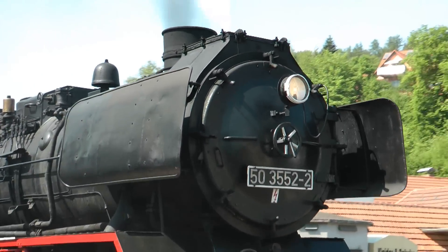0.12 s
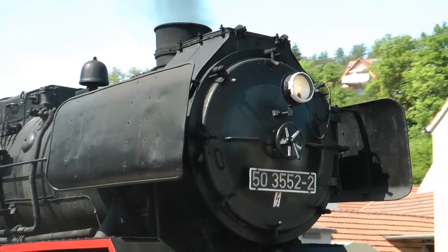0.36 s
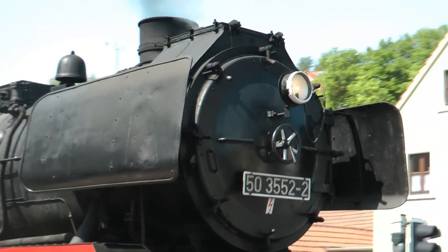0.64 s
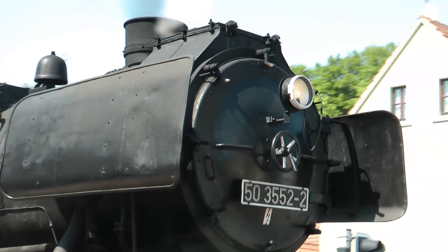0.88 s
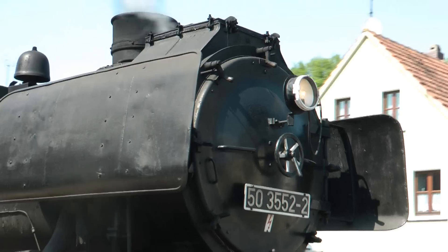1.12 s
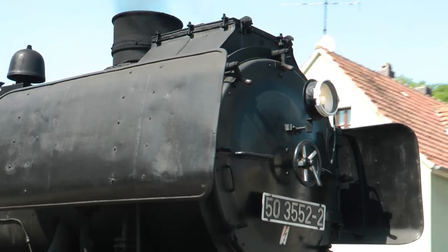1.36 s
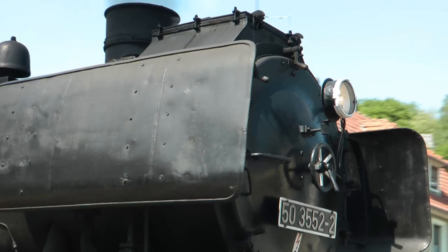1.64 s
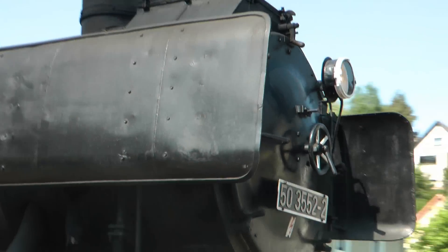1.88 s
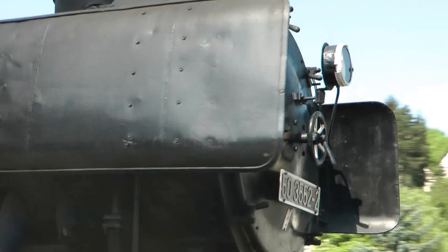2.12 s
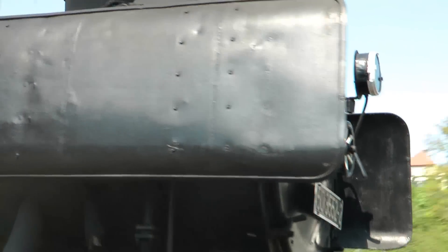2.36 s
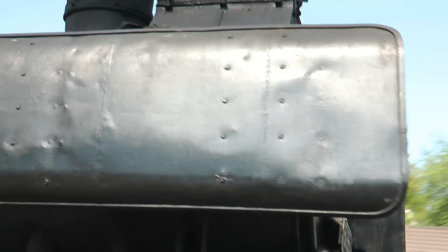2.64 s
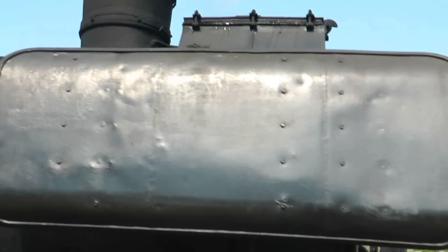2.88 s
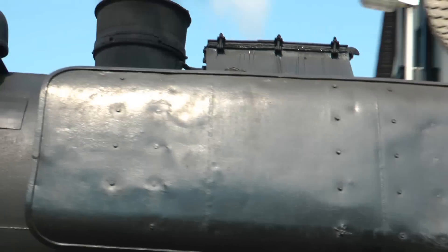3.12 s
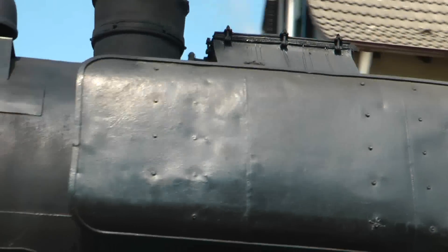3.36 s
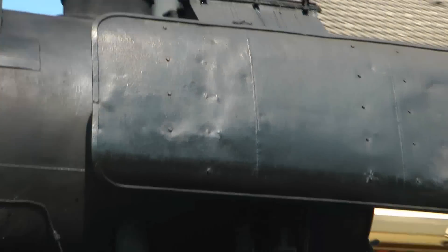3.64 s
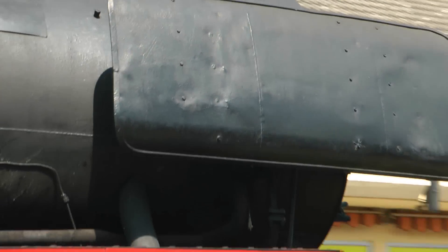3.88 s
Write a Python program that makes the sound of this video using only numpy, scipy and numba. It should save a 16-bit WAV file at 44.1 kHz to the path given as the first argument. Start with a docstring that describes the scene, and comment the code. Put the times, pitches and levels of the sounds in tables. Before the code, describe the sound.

Close outdoor stereo pickup of a passing steam engine: a short steam spurt, hollow chuffs with a dull valley echo, then two fierce hissing blasts that duck everything else, faint bell and light wind flutter.

```python
"""Steam locomotive with bell

Exhaust beats each hiss, then boom as a wavering chimney tone in a dull roar, with a tail from the valley.
A cylinder cock blows long jets of coloured noise; a second leak and a hoarse wheeze seethe mostly to the left.
A small bell rings as decaying sines, with a few dull knocks as pulses; wheels and boiler rumble as low noise
and wind flutters as band-passed noise. A gain control ducks everything when the sound is loud."""
import sys
import numpy as np
from scipy import signal
from scipy.fft import rfft, irfft
from scipy.io import wavfile
from scipy.ndimage import uniform_filter1d
from numba import njit

SR = 44100
rng = np.random.default_rng(int(sys.argv[2]) if len(sys.argv) > 2 else 0)


def attenuation_scalar(level_db):
    """Turn a level in dB into a linear amplitude multiplier (20 dB per decade)."""
    decades = np.asarray(level_db, float) / 20
    return 10 ** decades


def dump(signal):
    """Clip the signal to [-1, 1] and save it as 16-bit WAV at the path in sys.argv[1]."""
    limited = np.clip(np.atleast_2d(signal).T, -1, 1)
    pcm = np.round(limited * 32767).astype(np.int16)
    wavfile.write(sys.argv[1], SR, pcm)


N = 176400  # samples


def curve(table, column=1):
    """Linear interpolation: a table column joined by straight lines in time."""
    rows = np.array(table, float)
    return np.interp(np.arange(N) / SR, rows[:, 0], rows[:, column])


def unit(x):
    """Normalisation: scale to rms 1."""
    return x / np.sqrt(np.mean(x ** 2))


def walk(rate):
    """Band-limited fluctuation: random levels, rate per second, smoothed twice; rms 1."""
    hold = max(int(SR / rate), 2)
    steps = np.repeat(rng.standard_normal(N // 40), hold)[:N]
    return unit(uniform_filter1d(uniform_filter1d(steps, hold), hold))


def at_hz(table, hz):
    """Spectral envelope: a table read on a log-frequency axis."""
    rows = np.array(table, float)
    return np.interp(np.log(hz + 1), np.log(rows[:, 0]), rows[:, 1])


def panned(x, pan_db):
    """Interchannel level difference: tilt a sound by pan_db, left minus right."""
    return x * attenuation_scalar(np.array([[.5], [-.5]]) * pan_db)


# Likeness of left and right noise. Each row: frequency in Hz, correlation from 0 to 1.
LEFT_RIGHT_LIKENESS = [(150, 1), (400, 0.6), (1000, 0.56), (2000, 0.71), (4500, 0.94), (8000, 0.78),
                       (13000, 0.73)]


def steam(colour, flicker_db, spit):
    """Turbulent noise: partly correlated stereo in a colour, octave bands flickering independently; rms 1."""
    hz = np.arange(N // 2 + 1) * SR / N
    like = np.clip(at_hz(LEFT_RIGHT_LIKENESS, hz), 0, 1)
    grain = attenuation_scalar(spit * rng.exponential(1, N))  # spit: mean lift of single samples in dB
    gain = attenuation_scalar(at_hz(colour, hz))
    mid = rfft(grain * rng.standard_normal(N)) * gain * np.sqrt(1 + like)
    side = rfft(grain * rng.standard_normal(N)) * gain * np.sqrt(1 - like)
    left_right = np.array([mid + side, mid - side])
    out, octave = 0, np.log2(hz + 1)
    for centre in range(4, 15):  # bands centred on 2 ** centre Hz
        share = np.cos(np.pi / 2 * np.clip(octave - centre, -1, 1)) ** 2
        out = out + attenuation_scalar(flicker_db * walk(18)) * irfft(share * left_right, N)
    return unit(out)


# Exhaust beats. Each row: boom start in seconds, boom level in dB, chimney pitch in Hz,
# pitch sag in Hz per second, hold in seconds, hiss level in dB.
EXHAUST_BEATS = [(.545, -12, 181.7, 1.5, .07, -16.5), (.94, -9, 218.6, 449, 0.069, -18.5),
                 (1.355, -8.5, 183, 0.5, 0.069, -18), (1.745, -11, 189.2, -2, 0.061, -24),
                 (2.12, -7, 172.1, -48, 0.071, -20), (2.47, -5.5, 160.4, -0.5, 0.04, -16.5),
                 (2.835, -7.5, 166.6, -1.5, 0.013, -10.5), (3.18, -7, 190, -1.5, 0.017, -13.5),
                 (3.51, -6, 172, 2, 0.02, -11.5), (3.81, -9, 189, 8.5, 0.046, -15)]
BOOM_ATTACK_S, BOOM_RELEASE_S = .022, 0.013
RING_ON_DB, RING_ON_S = -6.5, 0.05  # the chimney rings on, softer, after each boom
HISS_RISE_S, HISS_FALL_S = 0.02, 0.046


def exhaust_beats():
    """Pulsed flow: the envelopes of boom and hiss, and the chimney pitch, set by each release of steam."""
    t = np.arange(N) / SR
    boom, hiss, pitch = np.zeros(N), np.zeros(N), np.full(N, 1. * EXHAUST_BEATS[0][2])
    ring = attenuation_scalar(RING_ON_DB)
    for start, db, hz, sag, hold, hiss_db in EXHAUST_BEATS:
        u = t - start
        late = np.maximum(u - BOOM_ATTACK_S - hold, 0)
        fall = (1 - ring) * np.exp(-late / BOOM_RELEASE_S) + ring * np.exp(-late / RING_ON_S)
        rise = np.sin(np.pi / 2 * np.clip(u / BOOM_ATTACK_S, 0, 1)) ** 2
        boom += attenuation_scalar(db) * rise * fall
        # the hiss swells until the boom starts, then dies away
        hiss += attenuation_scalar(hiss_db) * np.exp(np.minimum(u / HISS_RISE_S, -u / HISS_FALL_S))
        begun = u > -.05
        pitch[begun] = (hz - sag * np.clip(u, 0, .15))[begun]
    return boom, hiss, pitch


# Chimney overtones. Each row: multiple of the pitch, level in dB before fluctuation.
CHIMNEY_OVERTONES = [(2, -13.5), (3, -18.5), (4, -20.5), (5, -25)]
# Colour of the roar around the tone. Each row: frequency in Hz, relative level in dB per Hz.
ROAR_COLOUR = [(40, -36), (100, -7), (150, 3.5), (250, 0), (300, -5.5), (500, -8.5), (570, -10.5),
               (850, -14), (950, -22.5), (2000, -18), (3000, -60)]
# Colour of the exhaust hiss. Each row: frequency in Hz, relative level in dB per Hz.
HISS_COLOUR = [(350, -3), (600, 1.5), (1590, 4.5), (1850, 0), (2270, 3.5), (3990, 4), (5050, 4),
               (16000, -18.5)]
PITCH_WAVER, BOOM_THROB_DB = .045, 1.6  # rms: fraction of the pitch, level of the fundamental
ROAR_DB = -8  # before the boom envelope


def exhaust(boom, hiss, pitch):
    """Pipe resonance: a wavering harmonic chimney tone within a dull roar, led in by a jet hiss."""
    phase = 2 * np.pi * np.cumsum(pitch * (1 + PITCH_WAVER * walk(45))) / SR
    tone = attenuation_scalar(BOOM_THROB_DB * walk(46)) * np.sin(phase)
    for multiple, db in CHIMNEY_OVERTONES:
        wander = 2.2 * walk(40)  # radians
        tone += attenuation_scalar(db + 4.26 * walk(60)) * np.sin(multiple * phase + wander)
    roar = attenuation_scalar(ROAR_DB) * steam(ROAR_COLOUR, flicker_db=1.5, spit=0)
    chimney = boom * (np.sqrt(2) * tone + roar)
    jet_hiss = hiss * steam(HISS_COLOUR, flicker_db=0, spit=0.8)
    return panned(chimney, 1.9) + panned(jet_hiss, 2.1)


# Colour of the echo tail. Each row: frequency in Hz, relative level in dB per Hz.
ECHO_COLOUR = [(24, -54), (40, -39.5), (134, -4.5), (168, -1), (262, -11), (302, -9.5), (358, -8.5),
               (606, -19), (969, -25), (1200, -30), (1560, -47), (2640, -120)]
ECHO_T60_S, ECHO_DB = 1.27, -10.5


def valley(boom):
    """Diffuse reverberation: each boom comes back from house fronts and slopes as a dull decaying tail."""
    fade = np.exp(-2 * np.log(1000) / ECHO_T60_S / SR)
    power = signal.lfilter([20 / SR], [1, -fade], boom ** 2)
    tail = attenuation_scalar(ECHO_DB) * np.sqrt(power) * steam(ECHO_COLOUR, flicker_db=5, spit=0)
    return panned(tail, 1.9)


# Cylinder cock jet. Each row: time in seconds, level in dB, lift of the treble in dB.
JET_COURSE = [(0, -18, -3), (.09, -17, -1.5), (.13, -28.5, 4.5), (.24, -28, -4), (.33, -17.5, -1),
              (.42, -9.5, -3), (.53, -12, -5), (.6, -17.5, -27), (.68, -50, -9), (1.3, -82, -33),
              (1.36, -14, -8), (1.42, -18.5, -2), (1.465, -2.5, 2.5), (1.56, -5, -2), (1.9, -4.5, -6),
              (2.1, -5.5, -5), (2.15, -10.5, -14), (2.25, -33.5, -3), (2.86, -50.5, 12.5), (2.9, -13, -12),
              (2.925, -6.5, -10), (3.0, -3.5, -11.5), (3.3, -4.5, -8), (3.49, -7.5, -3.5), (3.55, -25, -4),
              (3.62, -52, -9), (4, -36, -26)]
# Colour of the jet before the treble lift. Each row: frequency in Hz, relative level in dB per Hz.
JET_COLOUR = [(500, -29), (900, -18), (1500, -13), (2100, -8.5), (2330, -13), (2600, -7.5), (3500, -3),
              (3900, -8), (4400, -1.5), (5300, -1), (6200, 1), (6500, -1), (7000, -7), (8300, -4),
              (10000, -5), (11500, -9), (15700, -9.5)]
# Place of the jet. Each row: time in seconds, left minus right in dB.
JET_PLACE = [(0, .5), (1.8, 1), (2.5, 1), (3.4, -2), (4, -2.5)]
JET_TREBLE_HZ = 7400


def cock_jet():
    """Jet noise: long blasts of turbulent steam whose treble share drifts."""
    x = steam(JET_COLOUR, flicker_db=1.2, spit=0.5)
    high_pass = signal.butter(1, JET_TREBLE_HZ, "high", fs=SR, output="sos")
    treble = signal.sosfiltfilt(high_pass, x)
    x = x + (attenuation_scalar(curve(JET_COURSE, column=2)) - 1) * treble
    level = attenuation_scalar(curve(JET_COURSE) + 0.2 * walk(9.6))
    return panned(level * x, curve(JET_PLACE))


# Second leak. Each row: time in seconds, level in dB, left minus right in dB.
LEAK_COURSE = [(0, -24, -3), (.2, -36.5, -5), (.62, -27.5, 5.5), (.75, -28, 3), (.92, -24.5, 3.5),
               (1.02, -23.5, 3), (1.2, -26.5, 6), (1.4, -17, 2), (2.1, -21.5, -1), (2.27, -26.5, 6.5),
               (2.45, -25, 2), (2.62, -31, 5), (2.78, -33.5, 7), (3.4, -22, 2), (3.6, -22.5, 7.5),
               (3.79, -20.5, 8.5), (3.9, -23.5, 5.5), (4, -25.5, 13)]
# Colour of the leak. Each row: frequency in Hz, relative level in dB per Hz.
LEAK_COLOUR = [(350, -18), (600, -7.5), (1400, -5), (1740, -10.5), (1940, -6), (3260, -3.5), (3690, -4.5),
               (4230, -5), (6920, -11.5), (9090, -18), (15700, -25.5)]
# Hoarse wheeze of steam. Each row: time in seconds, level in dB.
WHEEZE_COURSE = [(0, -54), (.62, -55), (.74, -30.5), (.92, -23), (.99, -31), (1.1, -33), (1.22, -29),
                 (1.35, -30), (1.5, -55), (4, -50)]
# Colour of the wheeze, mainly two bands. Each row: frequency in Hz, relative level in dB per Hz.
WHEEZE_COLOUR = [(1500, -48), (1900, -2.5), (2100, 2), (2350, -9), (2800, -13), (3250, -1), (3500, -0.5),
                 (3750, -28), (4400, -21), (5150, -3.5), (5600, -18), (7000, -31)]


def leak():
    """Orifice noise: a broad seething and a two-band wheeze share one place."""
    seethe = attenuation_scalar(curve(LEAK_COURSE)) * steam(LEAK_COLOUR, flicker_db=1.5, spit=1.1)
    wheeze = attenuation_scalar(curve(WHEEZE_COURSE)) * steam(WHEEZE_COLOUR, flicker_db=4, spit=0.4)
    return panned(seethe + wheeze, curve(LEAK_COURSE, column=2))


# Bell blows. Each row: time in seconds, level in dB.
BELL_STROKES = [(.34, -26), (1.246, -18.5), (2.152, -18.5), (3.06, -27), (3.966, -24.5)]
# Bell mode frequencies, one per mode, in Hz.
BELL_MODE_HZ = [2826, 3644, 4533, 4953, 5496, 5652, 6541, 7084, 7224, 7660, 8791, 10130, 10650, 12470,
                14460, 5580, 5760]
# Bell modes in the same order. Each row: level in dB relative to the blow,
# 60 dB decay time in seconds before the cap below.
BELL_MODES = [(-7.5, 2.1), (-2.5, 2.6), (-3.5, 1.65), (-11, 0.34), (0.5, 0.5), (2, 0.16), (0.5, 0.14),
              (-2.5, .3), (-4, 0.29), (-7, 0.48), (-1, 0.26), (-11, 0.35), (-11, 0.31), (-12, .2),
              (-11, 0.15), (-1, 0.052), (-2, 0.076)]
BELL_LONGEST_T60_S = 1.0


def bell():
    """Modal synthesis: the clapper ticks and the bell's modes die away exponentially."""
    out = np.zeros(N)
    for start, db in BELL_STROKES:
        i = int(start * SR)
        u = np.arange(N - i) / SR
        ring = attenuation_scalar(2) * rng.standard_normal(N - i) * np.exp(-u / .002)  # clapper tick
        turns = rng.random(len(BELL_MODES))  # starting phases
        for hz, (mode_db, t60), turn in zip(BELL_MODE_HZ, BELL_MODES, turns):
            decay = np.exp(-np.log(1000) * u / min(t60, BELL_LONGEST_T60_S))
            ring += attenuation_scalar(mode_db) * np.sin(2 * np.pi * (hz * u + turn)) * decay
        out[i:] += attenuation_scalar(db) * ring
    return out


# Small dull knocks close by. Each row: time in seconds, level in dB.
KNOCK_BLOWS = [(.031, -14.5), (.054, -18), (.098, -17), (.106, -19), (0.127, -17), (.173, -22), (.204, -28),
               (.363, -17.5)]
KNOCK_S = 0.00058  # time constant


def knocks():
    """Impulsive excitation: each knock is one soft push and rebound."""
    t, out = np.arange(N) / SR, np.zeros(N)
    for start, db in KNOCK_BLOWS:
        u = np.clip((t - start) / KNOCK_S, 0, 60)
        out += attenuation_scalar(db) * np.e * u * np.exp(-u) * (1 - u / 2)
    return out


# Colour of the rumble of wheels and boiler. Each row: frequency in Hz, relative level in dB per Hz.
RUMBLE_COLOUR = [(25, -30), (100, -3), (200, 4), (300, 1.5), (700, -12.5), (1500, 1), (3000, -29),
                 (5000, -52)]


def rumble():
    """Broadband rolling noise: a quiet, flickering bed from wheels and boiler."""
    return attenuation_scalar(-44) * steam(RUMBLE_COLOUR, flicker_db=2.5, spit=0)


WIND_DB, WIND_BEAT_DB = -32, -40  # steady part before fluctuation, part driven by the boom envelope
WIND_BAND_HZ = [30, 82]


def wind(boom):
    """Pressure fluctuation: a low flutter, opposite on two microphone ports, swelling with each boom."""
    band = signal.butter(2, WIND_BAND_HZ, "band", fs=SR, output="sos")
    flutter = unit(signal.sosfilt(band, rng.standard_normal(N)))
    swell = attenuation_scalar(WIND_DB + 9 * walk(5.7)) + attenuation_scalar(WIND_BEAT_DB) * uniform_filter1d(boom, 3000)
    return swell * flutter * np.array([[1], [-1]])


def scene():
    """Superposition: all sources added together."""
    boom, hiss, pitch = exhaust_beats()
    locomotive = exhaust(boom, hiss, pitch) + valley(boom) + cock_jet() + leak()
    return locomotive + bell() + knocks() + rumble() + wind(boom)


@njit
def follow(x, up, down):
    """Envelope detection: a peak follower, quick up and slow down."""
    e, out = x[0], np.empty(len(x))
    for i in range(len(x)):
        e += (x[i] - e) * (up if x[i] > e else down)
        out[i] = e
    return out


def top_cut(x):
    """Nothing passes above the cut-off."""
    return signal.sosfilt(signal.butter(12, 17080, fs=SR, output="sos"), x)


AGC_TOP_DB, AGC_RATIO, AGC_BASS_CUT_HZ = -13.5, 5, 310
AGC_ATTACK_S, AGC_RELEASE_S = 0.0021, 0.22
TOP_HZ = 15850


def record(dry):
    """Dynamic range compression: gain control, less sensitive to bass, ducks loud sound; the top is cut."""
    bass_cut = signal.butter(1, AGC_BASS_CUT_HZ, "high", fs=SR, output="sos")
    peak = np.abs(signal.sosfilt(bass_cut, dry)).max(0)
    peak[0] = 2 * peak[:2000].mean()  # starting level of the follower
    envelope = follow(peak, 1 / (AGC_ATTACK_S * SR), 1 / (AGC_RELEASE_S * SR))
    gain = np.minimum(attenuation_scalar(AGC_TOP_DB) / envelope, 1) ** (1 - 1 / AGC_RATIO)
    low_pass = signal.ellip(10, .2, 70, TOP_HZ, fs=SR, output="sos")
    mix = signal.sosfilt(low_pass, dry * gain * attenuation_scalar(0.5))
    return top_cut(mix)


dry = scene()
out = record(dry)
dump(out)
```